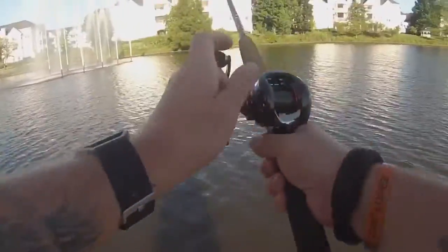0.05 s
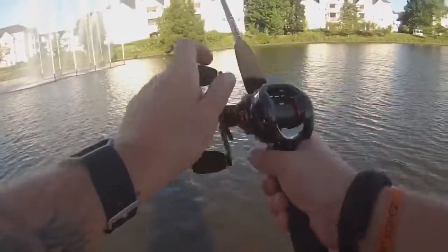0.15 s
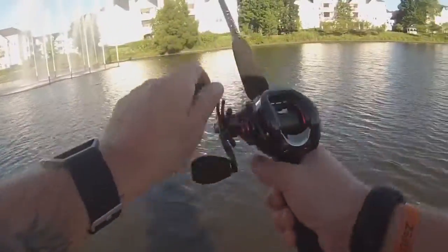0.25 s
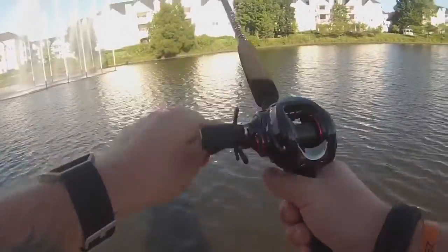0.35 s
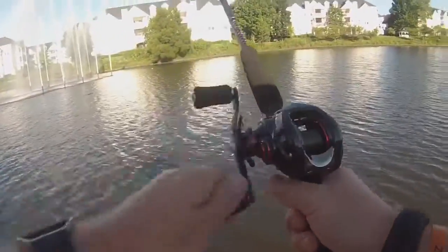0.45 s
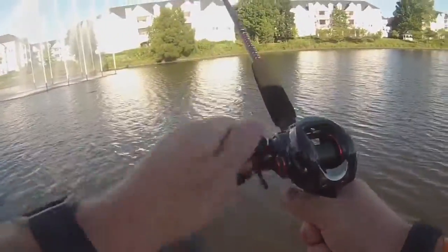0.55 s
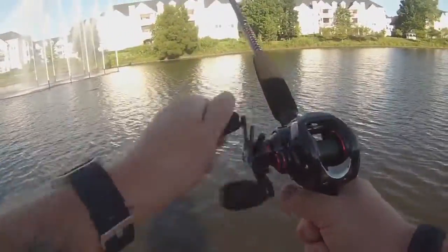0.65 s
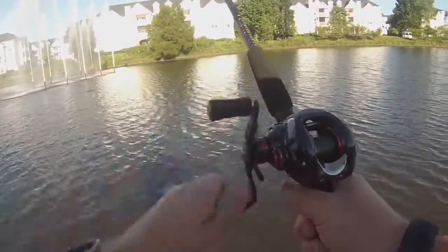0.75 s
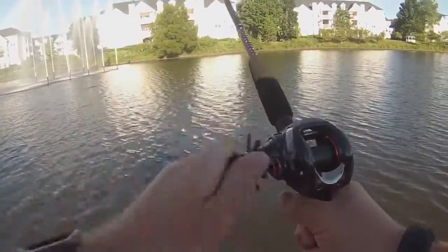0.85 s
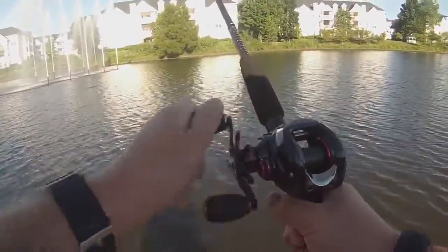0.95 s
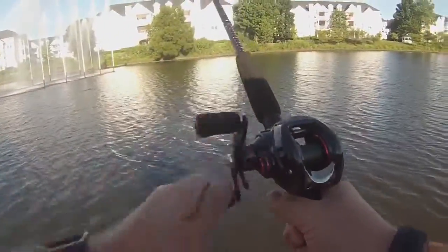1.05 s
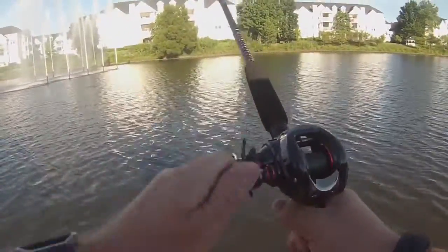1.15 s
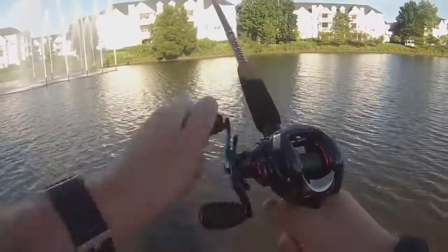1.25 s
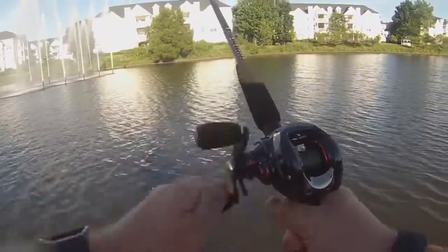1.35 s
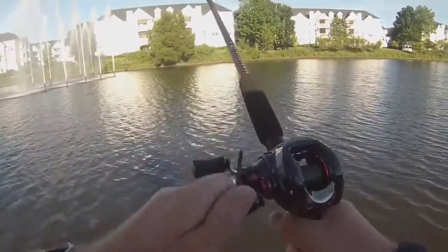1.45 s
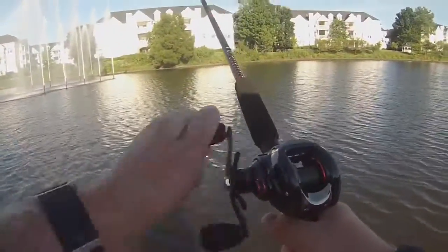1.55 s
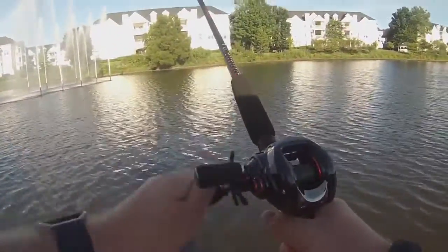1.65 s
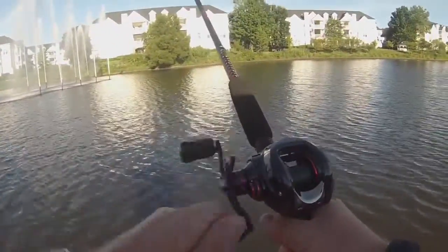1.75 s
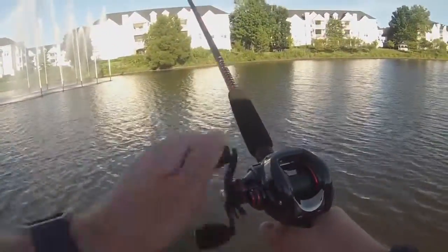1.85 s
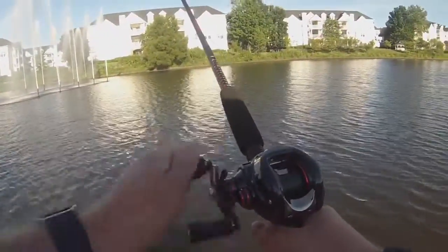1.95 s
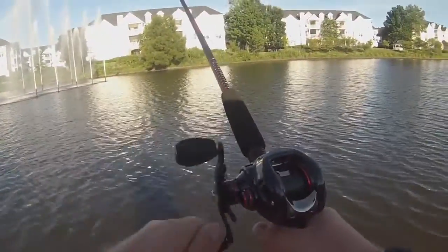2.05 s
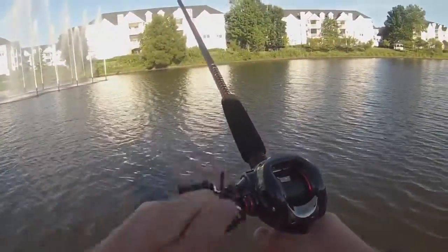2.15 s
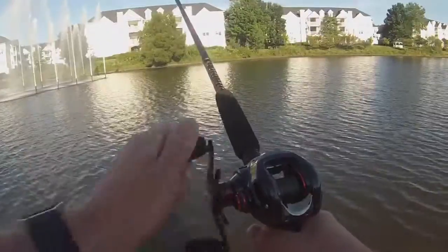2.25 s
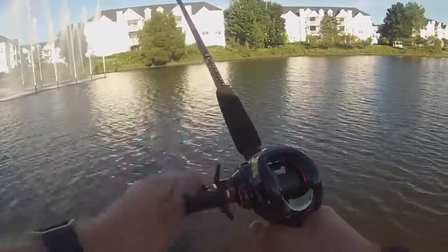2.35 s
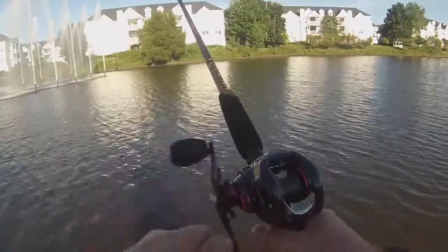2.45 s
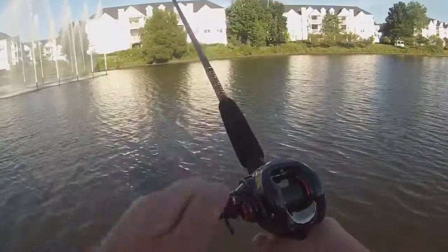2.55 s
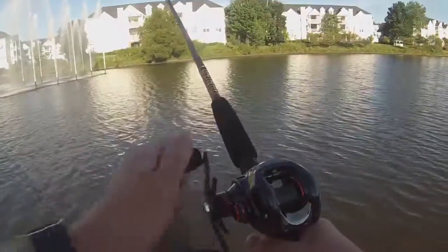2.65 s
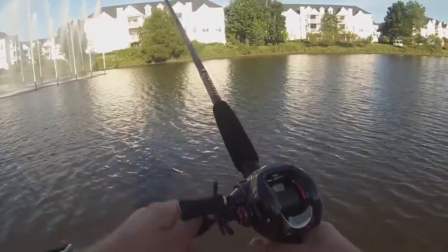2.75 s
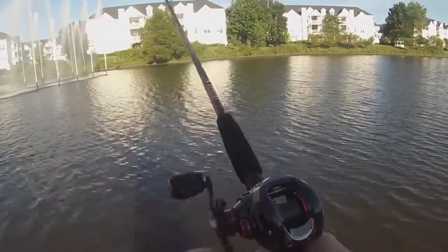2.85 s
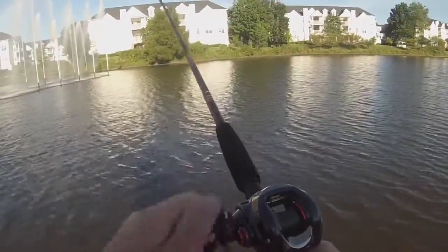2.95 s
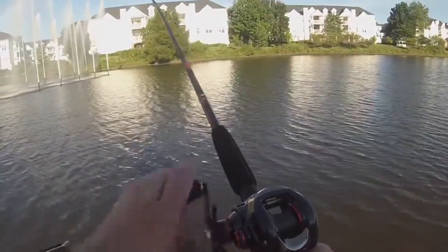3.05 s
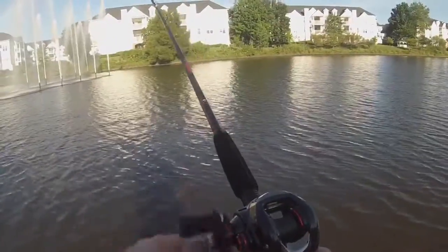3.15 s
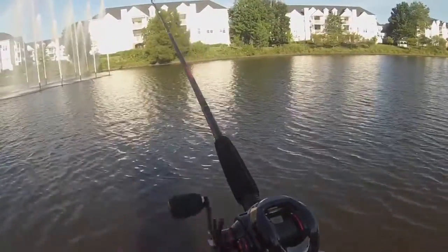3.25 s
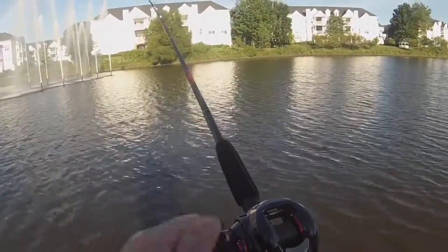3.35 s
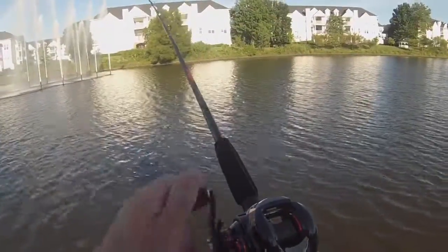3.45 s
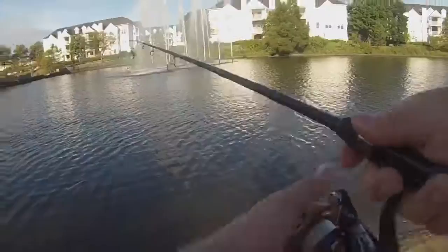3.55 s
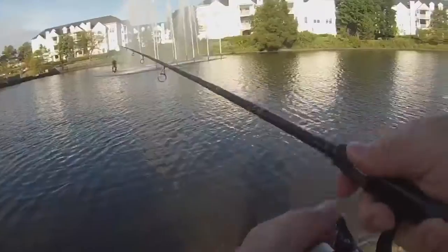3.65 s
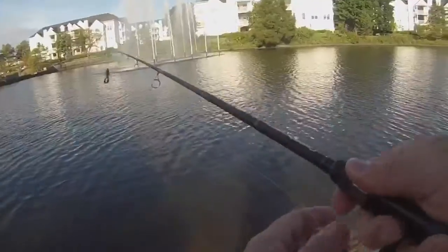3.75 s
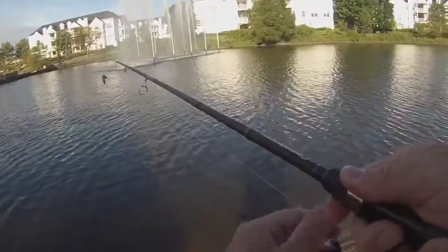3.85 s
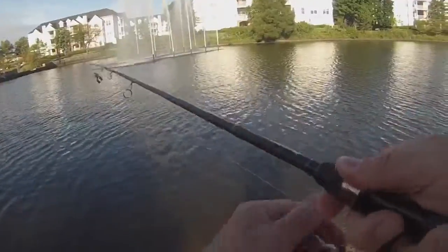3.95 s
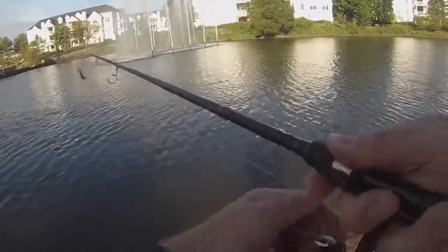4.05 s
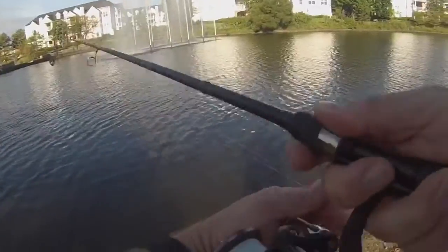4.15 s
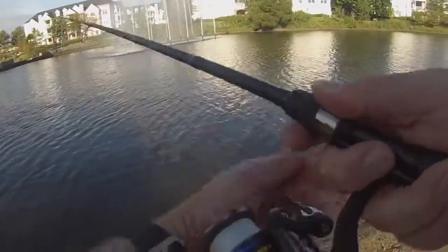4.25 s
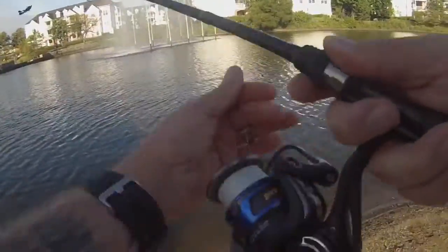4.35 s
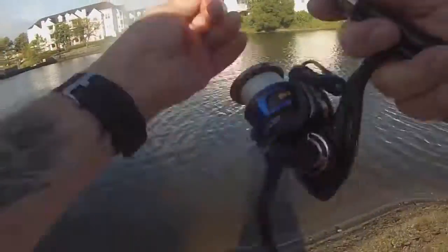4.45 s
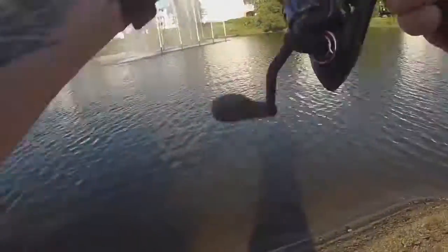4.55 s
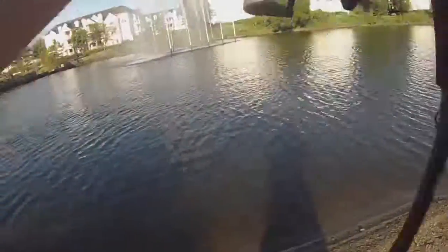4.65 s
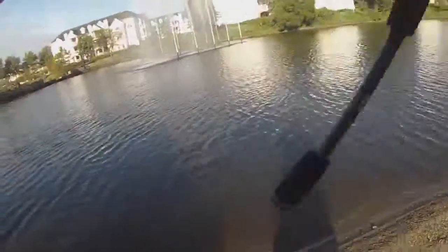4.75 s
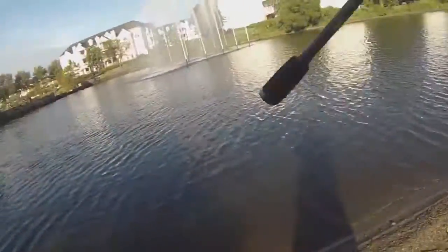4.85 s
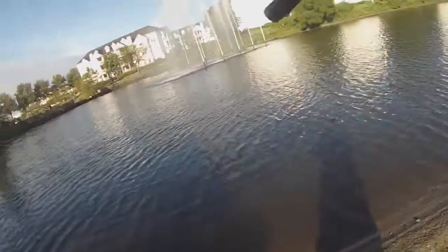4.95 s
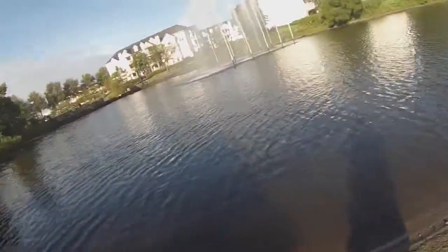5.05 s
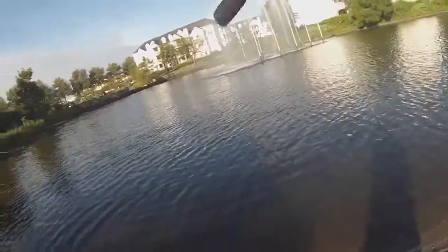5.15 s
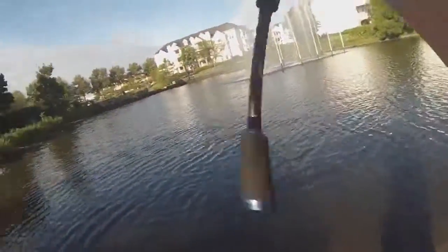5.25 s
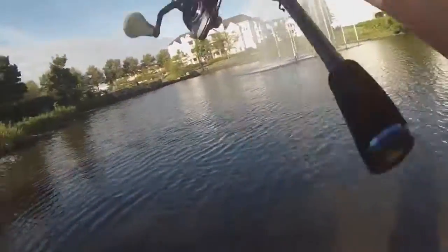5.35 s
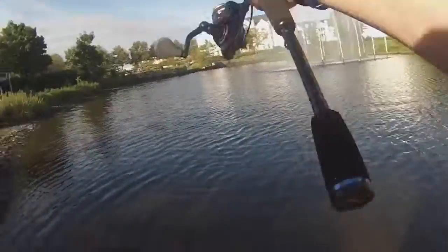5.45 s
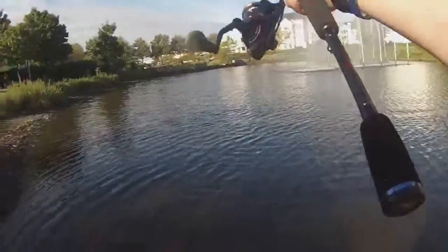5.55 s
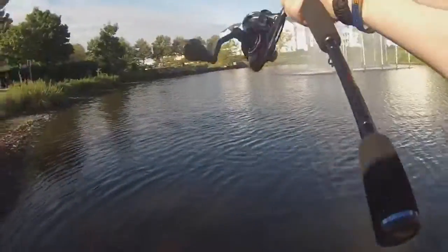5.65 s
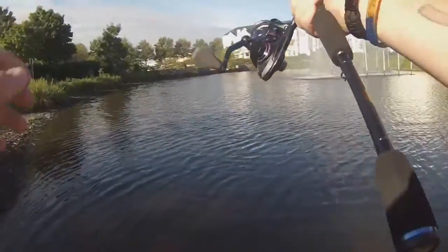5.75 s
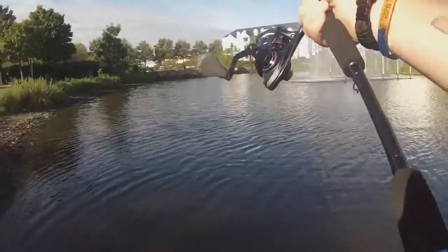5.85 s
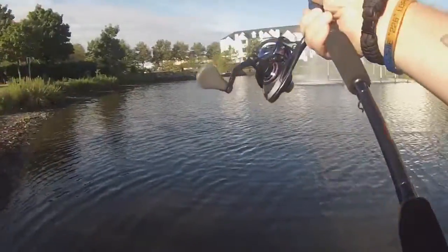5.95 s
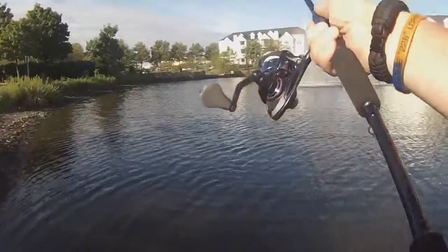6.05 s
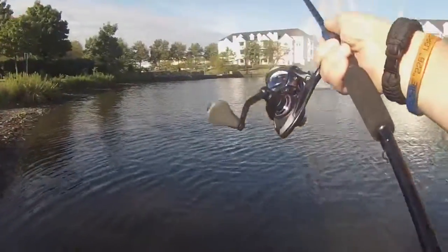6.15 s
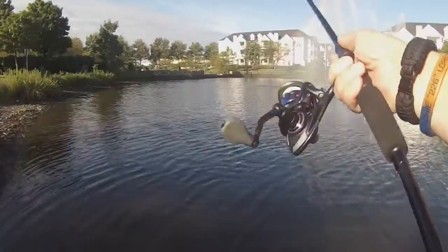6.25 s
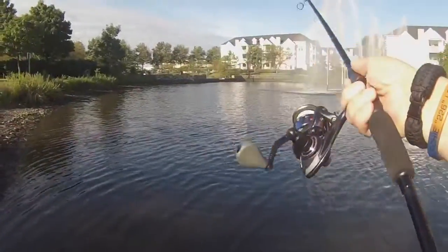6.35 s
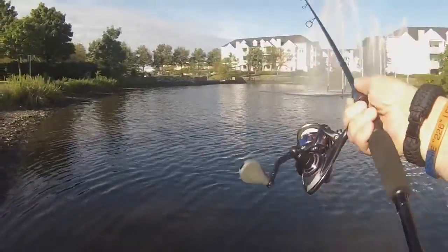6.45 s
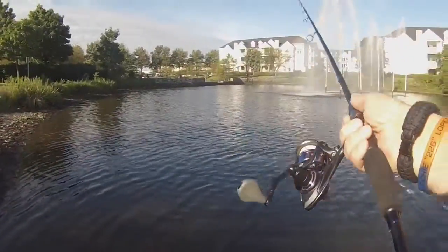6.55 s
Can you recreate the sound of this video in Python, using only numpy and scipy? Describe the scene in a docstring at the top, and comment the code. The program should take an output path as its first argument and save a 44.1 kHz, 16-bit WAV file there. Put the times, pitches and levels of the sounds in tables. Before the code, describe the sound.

A muffled, narrow-sounding microphone on a strap picks up soft continuous fountain splashing across open water. Sparse metal ticks of a fishing reel and dull strap thumps sit over faint wind rumble. After a very short fade out and in, a barely audible hum joins. More light clicks follow, then a sudden dry knock dominates, trailed by a cluster of bumps and clicks, and finally weak rattling under the spray.

```python
"""Distant fountains splash on a pond throughout, as shaped noise coloured by a small sealed camera shell.
Early on a reel and rod click (bursts of taps ringing metal modes), over strap bumps and breeze rumble.
Past the middle the sound fades out and in once; from there a low sine hum runs along.
The camera then turns away from the water, a blow rings the shell wall (decaying cosines),
more bumps and clicks crowd in soon after it, and soft rattles follow."""
import sys
import numpy as np
from scipy import signal
from scipy.io import wavfile
from scipy.ndimage import uniform_filter1d

SR = 44100
rng = np.random.default_rng(int(sys.argv[2]) if len(sys.argv) > 2 else 0)


def unload_wav(signal):
    """Save mono or channel-first audio to the path in sys.argv[1] as 16-bit WAV at rate SR, clipped to [-1, 1]."""
    wavfile.write(
        sys.argv[1],
        SR,
        np.round(np.clip(np.atleast_2d(signal).T, -1, 1) * 32767).astype(np.int16),
    )


def voltage_ratio(decibels):
    """Convert decibels (scalar or array-like) to amplitude ratios, 20 dB per decade."""
    exponent = np.asarray(decibels, float) / 20
    return 10 ** exponent


N = 291501  # length in samples
FADE_S = 3.613  # silent point of the fade; the hum starts here


def evened(x):
    """Scales to rms 1."""
    return x / np.sqrt(np.mean(x ** 2) + 1e-20)


def drift(size):
    """Slow random wander of rms 1: noise averaged twice over size samples."""
    once = uniform_filter1d(rng.standard_normal(N), size=size)
    return evened(uniform_filter1d(once, size=size))


def curve(rows, t):
    """Reads every column of a table at the times t."""
    s, *columns = np.transpose(rows)
    return [np.interp(t, s, c) for c in columns]


def add(mix, s, sound):
    """Mixes a sound in at time s."""
    part = mix[round(s * SR):][:len(sound)]
    part += sound[:len(part)]


def peaks(hz, f, width):
    """Power of resonances of height 1, one column each."""
    return 1 / (1 + (2 * (hz[:, None] - f) / width) ** 2)


def hiss(db, size):
    """Noise whose short-time spectra follow db(frames' times, Hz)."""
    frames = 4 * N // size + 8
    hz = np.fft.rfftfreq(size, 1 / SR)
    t = np.arange(frames) * size / 4 / SR
    a, b = rng.standard_normal((frames, len(hz), 2)).T
    spectra = (a + 1j * b) * voltage_ratio(db(t, hz))
    return signal.istft(spectra, nperseg=size, noverlap=3 * size // 4)[1][:N]


# fountain spray: time_s, level_db (its mean sets the overall rms), turned_away (0-1)
SPLASH = [(0, -50.5, 0.2), (.75, -51.5, 0.08), (3.05, -51.7, 0.02), (3.6, -51, 0.16), (3.63, -51, 0.45),
          (4.75, -51, 0.38), (5.0, -49.5, 0.7), (6, -50.4, 0.7), (6.61, -49.5, 0.97)]


def fountains(patchy_db=0.78, flicker_db=0.63):
    """Countless far drops merge into a hiss; patches and flicker drift through it."""
    def field(t, hz):
        level_db, away = curve(SPLASH, t)
        away = np.clip(away, 0, 1)
        facing_db, turned_db = shell_db(hz)
        colour_db = np.outer(facing_db, 1 - away) + np.outer(turned_db, away)
        patches = uniform_filter1d(rng.standard_normal((len(t), len(hz))), size=10, axis=0)
        patches = evened(uniform_filter1d(patches, size=12, axis=1)).T
        flicker = evened(uniform_filter1d(rng.standard_normal(len(t)), size=3))
        return colour_db + level_db - level_db.mean() + patchy_db * patches + flicker_db * flicker

    mean_db = np.mean(SPLASH, axis=0)[1]
    return voltage_ratio(mean_db) * evened(hiss(field, size=1024))


# air cavities of the shell: pitch_hz, width_hz, facing_water_db, turned_away_db
SHELL = [(1398.4, 364, -0.5, -0.5), (1654, 220, -2, 0.5), (1964, 170, -16, -10.5), (2337, 143, -9, -11.5),
         (2587.4, 133, -12, -10), (3000, 166, -18, -16), (3262, 280, -12.5, -12.5), (3540, 307, -12, -8.5),
         (3853, 290, -11.5, -18.5), (4347, 210, -20, -35.5), (4870, 450, -16, -35), (5700, 480, -20.5, -30),
         (6572, 470, -25, -26), (7200, 390, -20.5, -31), (7880, 520, -28.5, -38)]
# what the wall leaks between the cavities: pitch_hz, facing_water_db, turned_away_db
WALL = [(59.4, -1.5, -7.5), (296, -8, -11.5), (670, -13.5, -14.5), (1102, -9.5, -14.5), (2080, -15.5, -16),
        (3995, -23, -29.5), (8500, -32, -35), (10820, -31, -38), (12000, -33.5, -43.5), (13720, -38.5, -36),
        (14700, -41.5, -43.5), (15260, -43.5, -42.5)]


def shell_db(hz):
    """Colour of the shell facing the water and turned away: cavity peaks over the wall's leak."""
    f, width, *cavity_sides = np.transpose(SHELL)
    wall_hz, *wall_sides = np.transpose(WALL)
    colours = []
    for cavity_db, wall_db in zip(cavity_sides, wall_sides):
        leak_db = np.interp(np.log(hz + 1), np.log(wall_hz), wall_db)
        power = peaks(hz, f, width) ** 2 @ voltage_ratio(cavity_db) ** 2 + voltage_ratio(leak_db) ** 2
        colours.append(10 * np.log10(power))
    return colours


# taps and rattles of reel and rod: start_s, level_db, length_ms, centre_hz, spread_octaves
CLICKS = [(.168, -53, 7.1, 2400, 0.324), (.2177, -31, 0.8, 2310, 0.41), (.2197, -30, 3, 3540, 0.79),
          (0.2227, -37, 0.87, 2490, 0.52), (.2300, -44, 2.9, 2600, 0.88), (3.6885, -46.5, 0.82, 3400, 0.92),
          (4.1458, -50.5, 7.9, 3940, 0.52), (4.146, -48, 2.6, 1800, 0.26), (4.158, -56, 4, 5500, 1.2),
          (4.611, -59, 4, 4870, 0.69), (5.262, -52, 6, 3300, 0.26), (5.272, -49, 4.1, 4000, 0.45),
          (5.2770, -37.5, 5.8, 3400, 0.13), (5.2800, -40.5, 4.4, 1690, 0.12), (5.286, -44, 1.6, 3300, 0.52),
          (5.96, -60, 30, 2620, .15), (6.035, -53.5, 4.6, 2500, 0.29), (6.235, -58, 52, 2650, 0.286),
          (6.285, -57, 17.5, 2650, .15), (6.347, -61, 9, 2700, .15)]
# modes of the reel's metal parts: pitch_hz, width_hz, level_db (relative)
REEL = [(1200, 410, 1), (1690, 69, 0.5), (2373, 114, 2), (2700, 180, -5), (3400, 125, 4.5), (3810, 390, -7),
        (4800, 500, -13), (5680, 370, -10.5), (6200, 300, -3), (6240, 570, -11), (7200, 300, -3),
        (8140, 320, -8.5), (9400, 230, -8), (11300, 820, -9), (12500, 710, -22), (13800, 900, -17)]


def clicks(tap_db=2.5, rise_ms=0.56):
    """Each rattle is a burst of uneven taps that rings the modes near its own pitch and the high ones."""
    rattle_db, rattle_ms = -20, 6.8  # loose parts shiver on after the taps
    crack_hz, crack_octaves, crack_db = 7800, 0.45, -22.5  # taps also shake the high modes,
    crack_db_per_octave = 11  # the more the wider their spread
    out, hz = np.zeros(N), np.fft.rfftfreq(4096, 1 / SR)
    f, width, mode_db = np.transpose(REEL)
    metal = np.sqrt(peaks(hz, f, width) @ voltage_ratio(mode_db) ** 2)
    high = voltage_ratio(crack_db - 6 * (np.log2((hz + 1) / crack_hz) / crack_octaves) ** 2)
    t_ms = np.arange(2048) / SR * 1000
    contact = 1 - np.exp(-t_ms / rise_ms)  # builds up
    for s, db, ms, centre_hz, spread in CLICKS:
        band = voltage_ratio(-6 * (np.log2((hz + 1) / centre_hz) / spread) ** 2)
        gain = metal * np.hypot(band, high * voltage_ratio(crack_db_per_octave * spread))
        log_gain = np.log(np.maximum(gain, voltage_ratio(-100)))
        circle = np.concatenate([log_gain, log_gain[-2:0:-1]])
        # minimum phase: the ring follows the tap
        ring = np.fft.ifft(np.exp(np.conj(signal.hilbert(circle)))).real[:2048]
        force = np.sqrt(1 - np.minimum(t_ms / ms, 1)) + voltage_ratio(rattle_db) * np.exp(-t_ms / rattle_ms)
        noise, unevenness = rng.standard_normal((2, 2048))
        taps = noise * voltage_ratio(tap_db * unevenness) * force * contact
        burst = signal.fftconvolve(taps, ring)
        loudness = np.sqrt(np.sum(burst ** 2) / ((ms + 3) * SR / 1000))
        add(out, s, voltage_ratio(db) * burst / loudness)
    return out


# modes of the struck shell wall: pitch_hz, level_db (relative), t60_s
KNOCK_RING = [(141.2, 0, 0.0556), (432, 7.5, 0.0123), (587, -7, 0.017), (764, -8.5, 0.048),
              (984, -11, 0.02), (1420, -9, 0.032), (1824, -0.5, 0.023), (2450, -1.5, 0.027),
              (2678, -1.5, .025), (2954, -1, 0.014)]
# blows on the shell: start_s, peak_db, rise_ms (time constant of the push)
KNOCKS = [(5.0557, -10, 0.083), (5.197, -43.5, 0.19), (5.208, -44, 0.23)]


def knock(dip=0.32, lead=6.5):
    """Short blows set the wall of the shell ringing; the air dips just before it is pushed."""
    t, out = np.arange(4000) / SR, np.zeros(N)
    ring = sum(voltage_ratio(db - 60 * t / t60) * np.cos(2 * np.pi * hz * t) for hz, db, t60 in KNOCK_RING)
    for s, db, rise_ms in KNOCKS:
        u = np.arange(300) / (rise_ms * SR / 1000)
        late = np.maximum(u - lead, 0)  # the dip leads the push by this many rise times
        blow = late ** 3 * np.exp(-late) - dip * u ** 3 * np.exp(-u)
        sound = np.convolve(ring, blow)
        add(out, s, voltage_ratio(db) * sound / abs(sound).max())
    return out


# bumps on the strap: centre_s, level_db (before the swing's shape), push_ms, snap_ms, side (+1 or -1)
BUMPS = [(.355, -41, 4.4, 2.5, -1), (0.481, -40.5, 3.8, 1.4, -1), (1.021, -43, 4.2, 3.5, 1),
         (4.1308, -38, 3.8, .6, 1), (5.211, -44.5, 3.94, 3, -1), (5.25, -44.5, 3.7, 2.5, 1),
         (5.277, -40, 5.1, 3, -1), (5.314, -38, 2.65, 2, 1), (5.353, -36.5, 18, 2.6, 1),
         (5.396, -38, 3.3, 1.7, -1), (5.42, -40.5, 6, 2.85, -1), (5.434, -40, 3.9, 2.1, -1),
         (5.457, -38, 4.2, 1.6, 1), (5.541, -36.5, 2.5, 1.7, -1)]


def bumps():
    """Pressure builds slowly, snaps over to the other side and settles."""
    out, ms = np.zeros(N), (np.arange(4000) - 2000) / SR * 1000
    for s, db, push_ms, snap_ms, side in BUMPS:
        swing = -np.tanh(2 * ms / snap_ms) * np.exp(-(ms / push_ms) ** 2)
        add(out, s - 2000 / SR, np.sign(side) * voltage_ratio(db) * swing)
    return out


# breeze and strap rumble: time_s, level_db
RUMBLE = [(0.0, -58), (0.45, -54.5), (0.8, -54), (1.5, -55), (2.3, -60.5), (3.5, -63), (3.7, -55.5),
          (4.7, -58), (4.9, -50.5), (5.15, -55), (5.35, -46.5), (5.58, -48.5), (5.7, -57), (6.61, -54.5)]
# spectrum of the rumble: pitch_hz, level_db (relative)
RUMBLE_TILT = [(6, -4), (12, -4), (25, -8), (45, -15), (80, -19), (150, -20), (300, -30), (600, -61.5)]


def rumble(lumpy_db=2.0, gusty_db=2.0):
    """Lumpy, gusty pressure on the shell, almost all below 100 Hz."""
    f, tilt_db = np.transpose(RUMBLE_TILT)

    def tilt(t, hz):
        return np.interp(np.log(hz + 1), np.log(f), tilt_db)[:, None] + 0 * t

    steady = evened(hiss(tilt, size=4096))
    lumps, gusts = drift(1500), drift(4000)
    gusty = evened(steady * voltage_ratio(lumpy_db * lumps + gusty_db * gusts))
    return gusty * voltage_ratio(curve(RUMBLE, np.arange(N) / SR)[0])


# low hum: time_s, level_db
HUM = [(3.61, -53), (4.1, -56), (4.7, -60.5), (5.3, -59.5), (6, -62), (6.61, -60)]


def hum(pitch_hz=70.75, waver_db=0.75):
    """A low sine of fixed pitch whose level wavers a little, from the fade onward."""
    t = np.arange(N) / SR
    tone = np.sqrt(2) * np.sin(2 * np.pi * pitch_hz * t) * (t > FADE_S)
    return tone * voltage_ratio(curve(HUM, t)[0] + waver_db * drift(3000))


def scene():
    """All sources reach the one microphone."""
    return (fountains() + clicks() + knock() + bumps() + rumble() + hum())[None]


def roll_off(x):
    """The treble ends steeply here."""
    return signal.sosfilt(signal.butter(12, 15560, fs=SR, output="sos"), x)


def record(dry):
    """One fade out and in, then the band limit."""
    fade_out_s, fade_in_s, edge_hz = 0.034, 0.034, 15290
    t = np.arange(N) / SR - FADE_S
    fade = np.clip(np.maximum(-t / fade_out_s, t / fade_in_s), 0, 1)
    limit = signal.firwin(1023, edge_hz, window=("kaiser", 9), fs=SR)
    mix = signal.oaconvolve(dry * fade, limit[None], "same")
    return roll_off(mix)


dry = scene()
out = record(dry)
unload_wav(out)
```